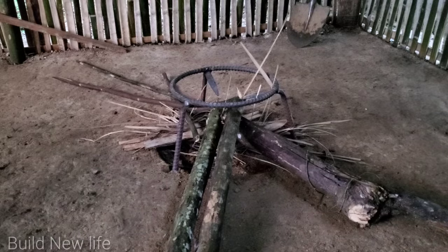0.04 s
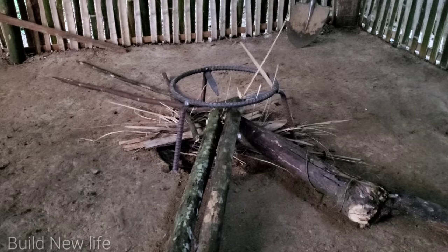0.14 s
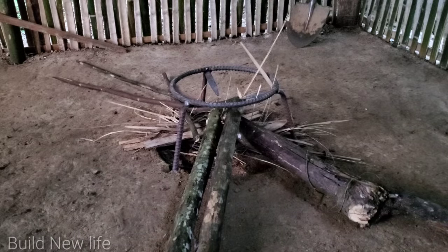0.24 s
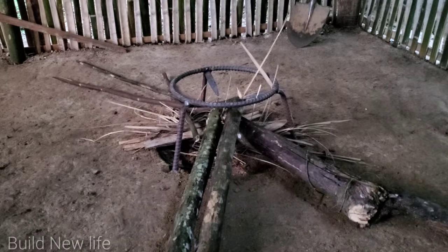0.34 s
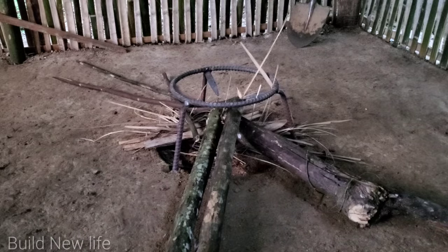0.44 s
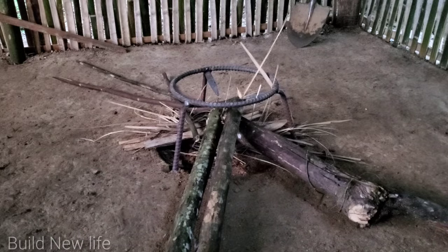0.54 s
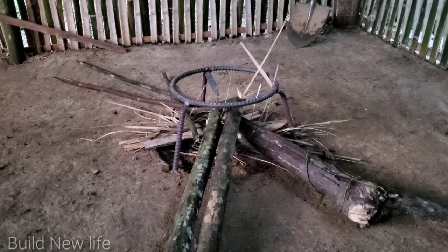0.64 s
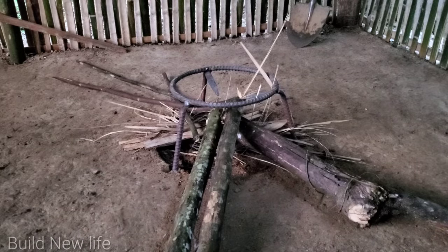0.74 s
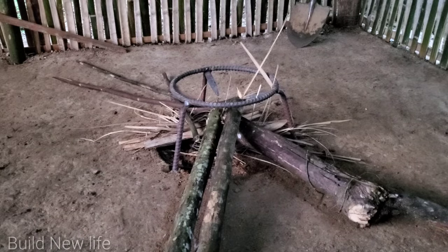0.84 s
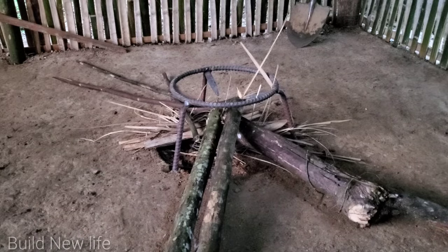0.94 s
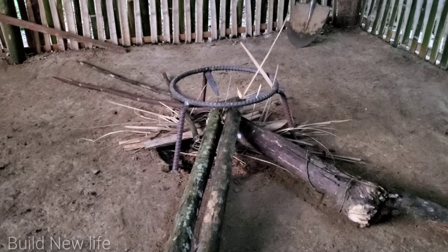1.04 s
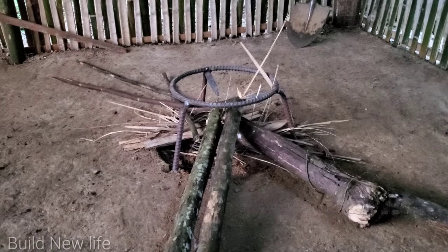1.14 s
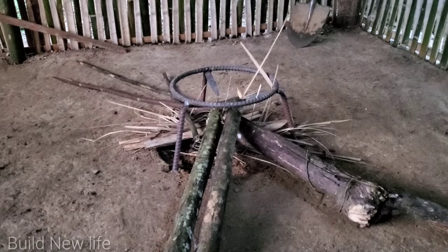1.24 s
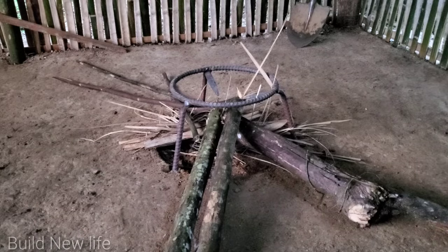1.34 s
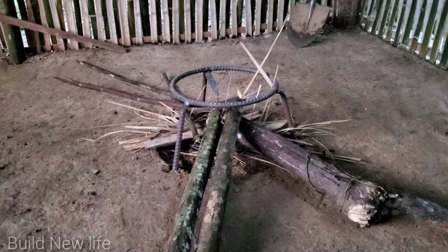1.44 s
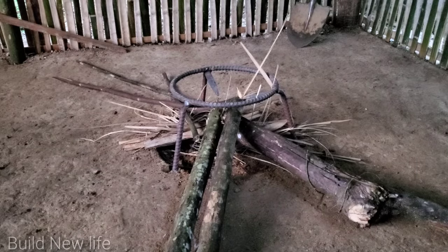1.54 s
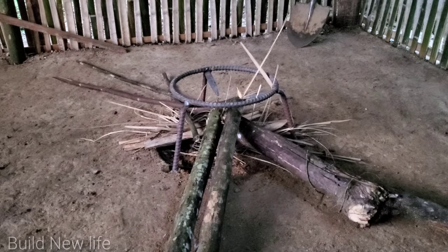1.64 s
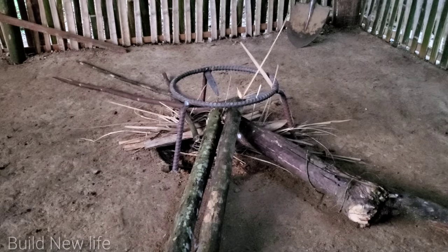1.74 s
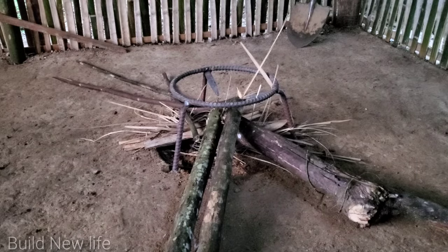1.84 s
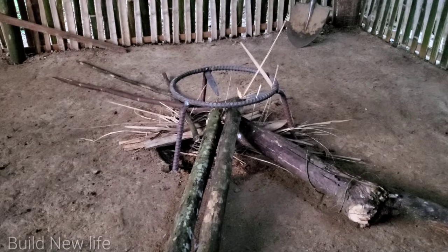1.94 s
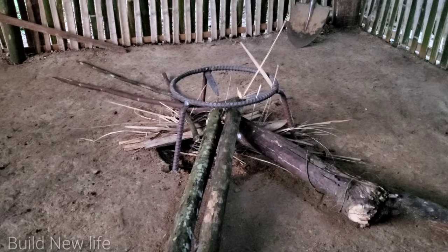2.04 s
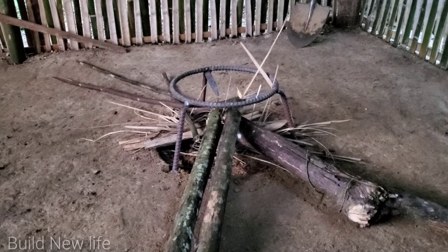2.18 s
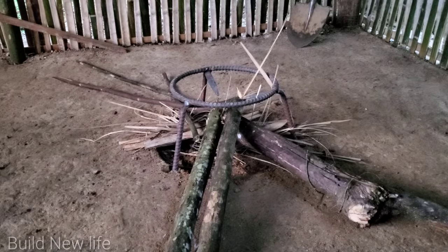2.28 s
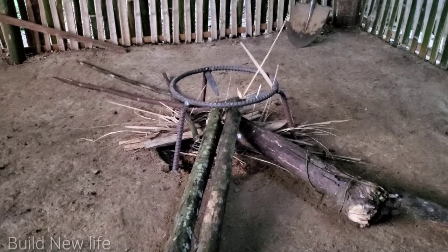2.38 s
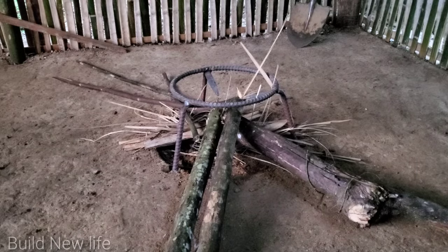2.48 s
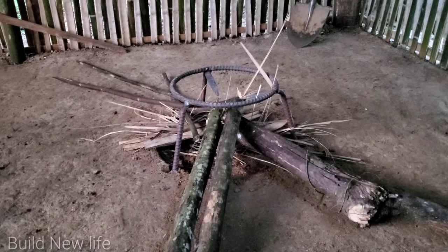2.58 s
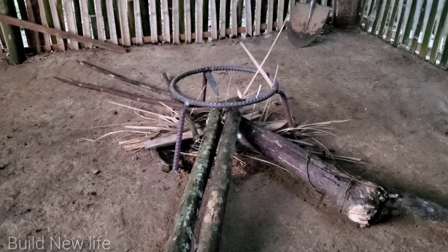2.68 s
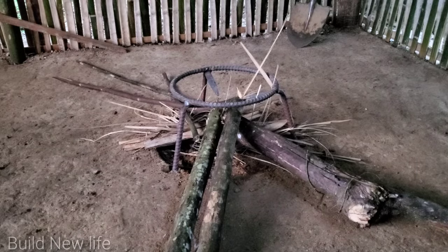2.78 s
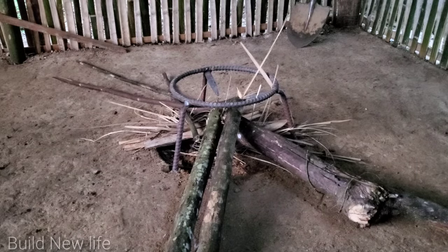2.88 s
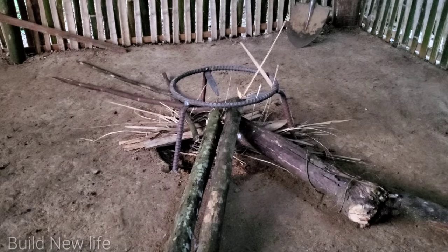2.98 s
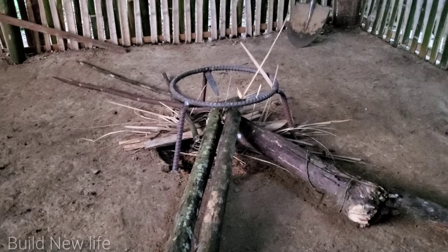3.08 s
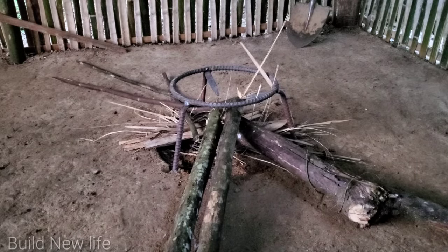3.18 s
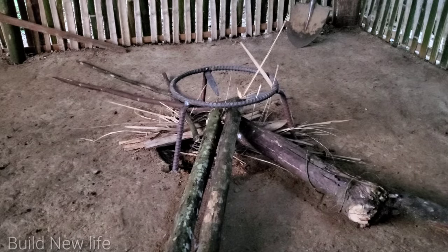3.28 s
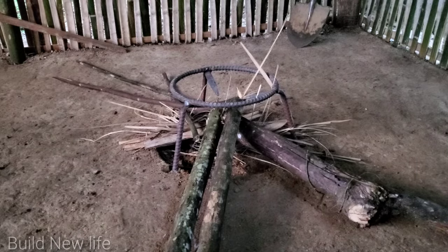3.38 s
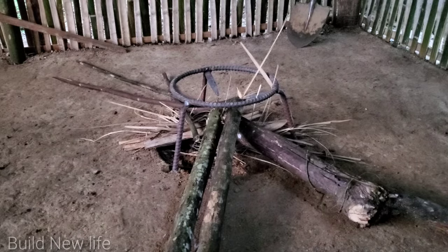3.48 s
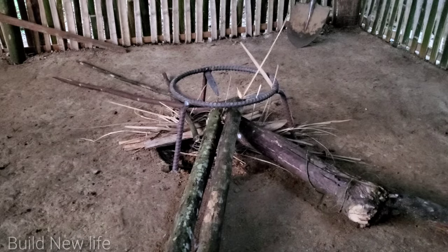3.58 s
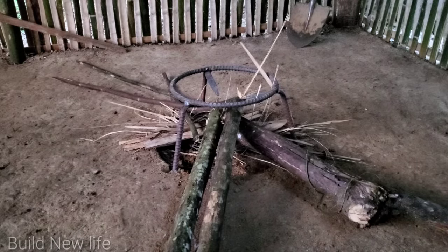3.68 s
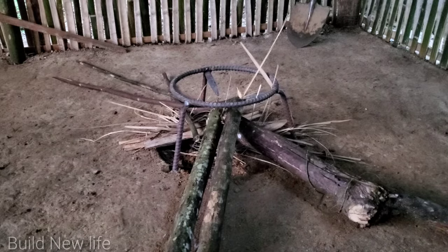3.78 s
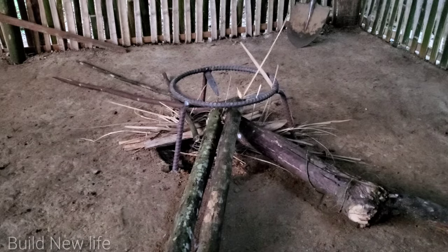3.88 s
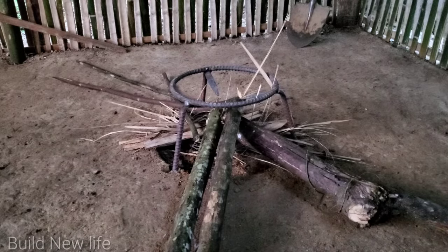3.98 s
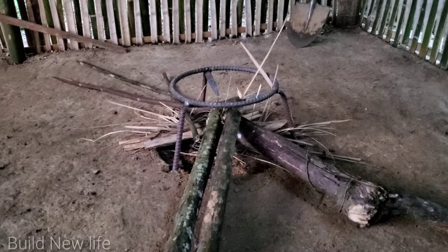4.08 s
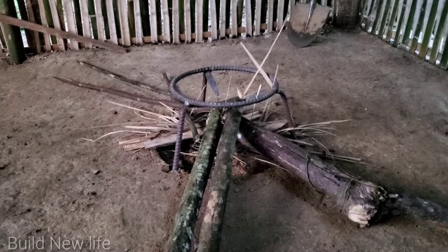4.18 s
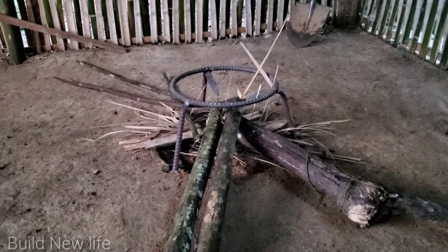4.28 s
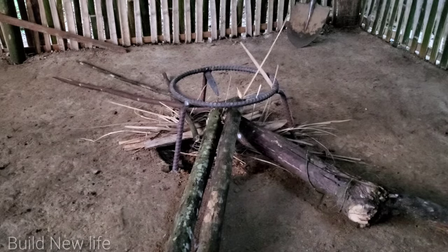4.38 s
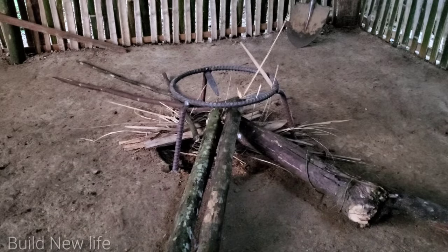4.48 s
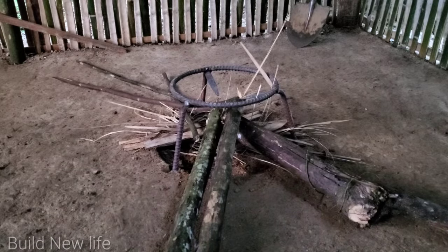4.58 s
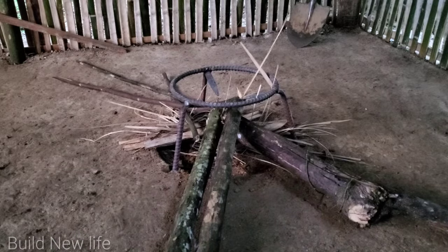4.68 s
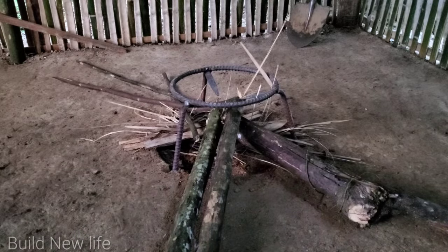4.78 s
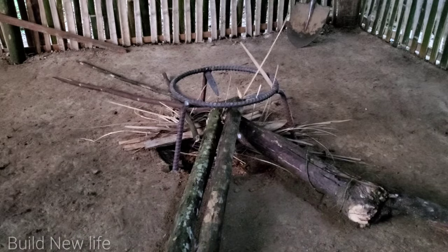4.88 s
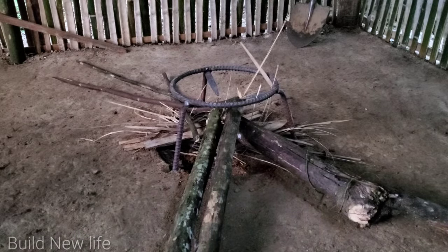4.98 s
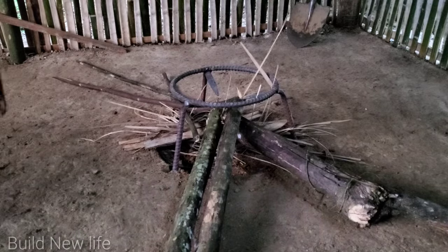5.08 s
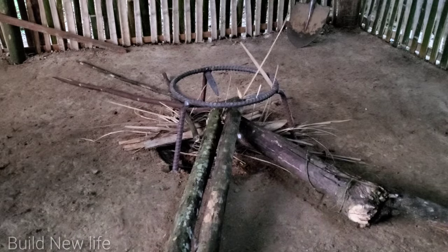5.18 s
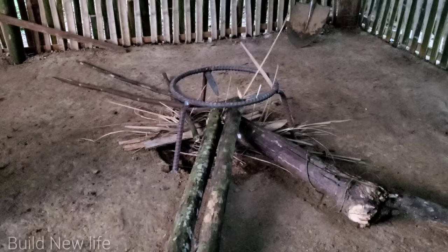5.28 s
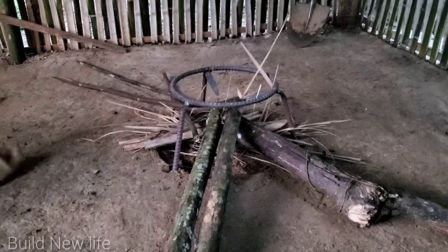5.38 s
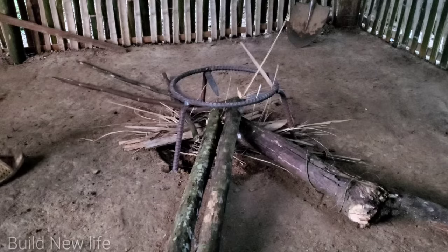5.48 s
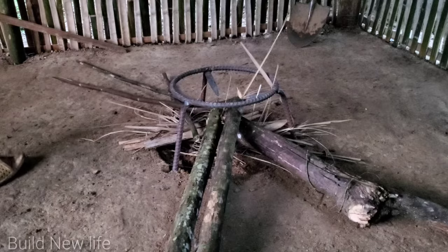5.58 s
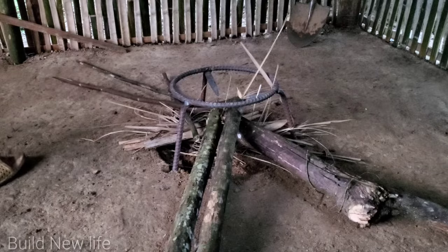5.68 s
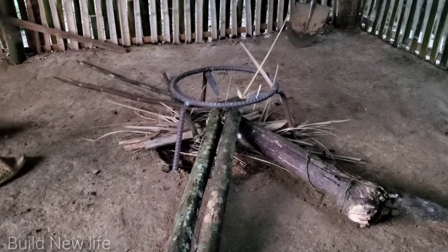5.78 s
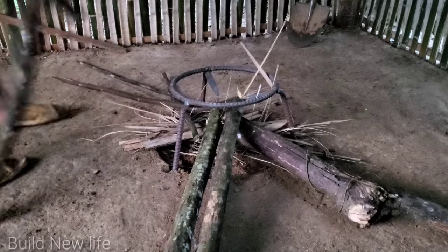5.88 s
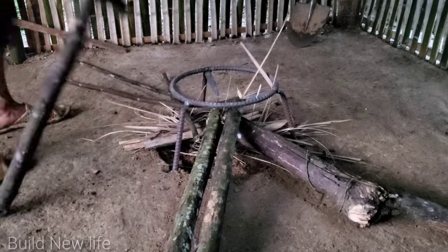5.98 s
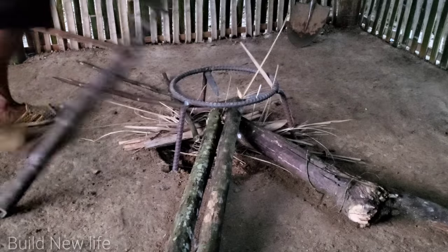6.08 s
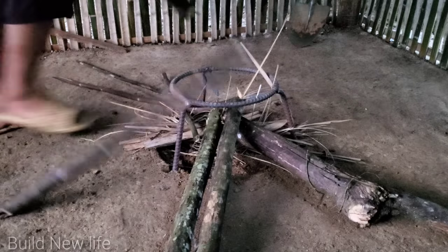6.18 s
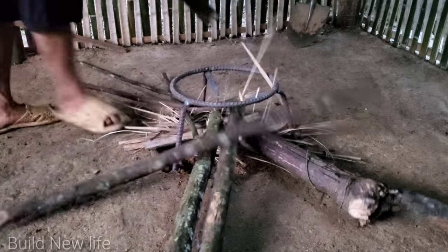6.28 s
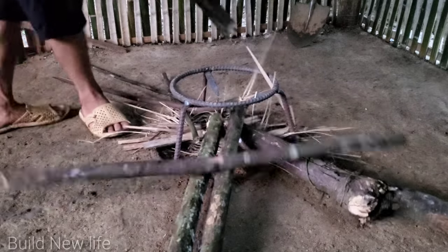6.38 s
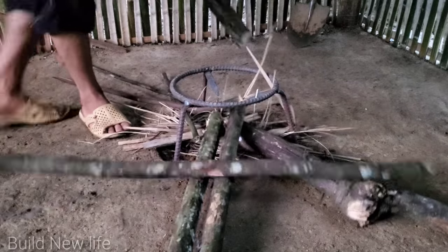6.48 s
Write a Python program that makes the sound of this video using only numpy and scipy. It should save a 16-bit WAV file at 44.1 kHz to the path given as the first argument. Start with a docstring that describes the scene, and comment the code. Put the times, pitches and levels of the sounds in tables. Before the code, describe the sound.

Someone shuffles about gathering dry wood with clacks and sharp snaps, then drops a log, while insects chirr softly.

```python
"""Gathering sticks in a hut at night

Someone shuffles in from the left over a dirt floor, gathering dry sticks, and knocks a log down by the
fire pit. Impacts excite the damped modes of wood and packed earth; friction, a dense train of tiny
contacts, makes the scraping; twigs snap by brittle fracture. The hut adds short echoes to the impacts,
and outside a chorus of insects chirrs over a faint hiss of air."""
import sys
import numpy as np
from scipy import signal
from scipy.fft import rfft, irfft, next_fast_len
from scipy.io import wavfile
from scipy.ndimage import uniform_filter1d

SR = 44100
rng = np.random.default_rng(int(sys.argv[2]) if len(sys.argv) > 2 else 0)


def unload_audio(sound):
    """Save the sound as a 16-bit wav file, at the path given as the first command line argument."""
    columns = np.transpose(np.atleast_2d(sound))
    # keep every value between -1 and 1, then stretch to whole-number steps
    steps = np.round(np.clip(columns, -1, 1) * 32767)
    wavfile.write(sys.argv[1], SR, steps.astype(np.int16))


N = 287965
FFT_SIZE = next_fast_len(N)
# Modes of the log: (frequency [Hz], level [dB], T60 [s])
LOG_MODES = [(292, -34, 0.094), (379, -9, 0.54), (503, -36, 0.072), (646.4, -5, 0.25), (786, -0.5, 0.047),
             (890, -1, 0.033), (1186, 8.5, 0.035), (1220, 4, 0.02), (1365, 18, 0.011), (1600, 6.5, 0.026),
             (1790, -40, .04), (2600, 1, 0.023)]


def stick_clacks():
    """Impact excitation: a contact and its dying rattle drive the modes of stick, bundle and log."""
    # (time [s], stick peak [dB], stick pitch [Hz], snap peak [dB], bundle peak [dB])
    clacks = [(.326, -54, 700, -31, -64), (.4205, -45.5, 643, -41, -52), (1.265, -42.5, 1080, -52, -66),
              (1.3234, -46, 796, -38, -50), (1.458, -48, 1120, -54, -52), (1.5921, -34, 1560, -52, -81),
              (1.6686, -41, 750, -37, -62), (1.7043, -32, 724, -47, -41.5), (1.7734, -33, 755, -28, -34),
              (1.774, -37, 1620, -50, -52), (1.956, -45.5, 1510, -55, -53), (2.0532, -42, 800, -31, -47),
              (2.907, -42, 1460, -41, -46), (2.9924, -43, 1310, -44, -82), (3.109, -42.5, 1360, -55, -60),
              (3.229, -52, 2750, -50, -60), (3.298, -46, 1750, -55, -79), (3.341, -36, 2020, -42, -69),
              (3.5171, -40, 1560, -46, -43), (3.56, -29, 2850, -26, -54), (3.6237, -28.5, 1600, -45, -67),
              (3.679, -29, 2420, -55, -41), (3.777, -46, 1880, -55, -42), (3.903, -44, 2400, -51, -70),
              (4.043, -37.5, 1490, -63, -45), (4.0844, -42.5, 740, -35, -52), (4.226, -36, 790, -48, -40.5),
              (4.2534, -23.5, 3030, -35, -55), (4.2654, -44, 3020, -32, -56), (4.3777, -26, 1760, -31, -66),
              (4.4053, -36.5, 790, -33, -50), (4.4302, -26.5, 2920, -46, -62),
              (4.4465, -27, 3100, -53, -65), (4.4873, -26.5, 3130, -40, -71),
              (4.562, -28.5, 2540, -43, -56), (4.65, -39, 1650, -48, -39), (4.6764, -36, 2100, -47, -56),
              (4.738, -60, 1410, -50, -70), (4.7703, -27, 1570, -38, -61), (4.806, -33, 1560, -50, -69),
              (4.8441, -40.5, 2660, -43, -40), (5.11, -33, 1760, -51, -38), (5.2083, -41, 1930, -58, -59),
              (5.2698, -21, 2800, -23, -37), (5.3095, -45, 1940, -49, -50), (5.319, -21, 3130, -42, -59),
              (5.448, -35, 2030, -50, -52), (5.5582, -44, 880, -47, -47), (5.629, -23, 3180, -27, -44),
              (5.642, -46, 1750, -27, -49), (5.678, -45, 1180, -47, -37.5), (5.77, -53, 1150, -57, -50),
              (5.8794, -79, 2090, -54, -59), (5.9631, -44, 1740, -50, -37)]
    # Modes of a stick: (frequency ratio [1], life to -60 dB [cycles], level [dB])
    stick_modes = [(1.0, 24, -6.5), (1.0, 8, 0), (.62, 7, -6), (1.3, 10, -4), (1.75, 11, -6), (.4, 6, -13)]
    rattle_t60, rattle_share = .065, .17  # s; size relative to the first contact
    out, t = np.zeros(N), np.arange(3600) / SR
    chance = rng.standard_normal((len(clacks), 2, len(t)), np.float32)
    detunings = rng.uniform(.85, 1.15, (len(clacks), len(stick_modes)))
    detunings[:, 0] = 1
    mode_weights = rng.random((len(clacks), len(LOG_MODES)))
    snap_band = signal.butter(2, [4000, 15000], "band", fs=SR, output="sos")
    bundle_band = signal.butter(2, [300, 1000], "band", fs=SR, output="sos")
    for clack, (size, trigger), detune, weights in zip(clacks, chance, detunings, mode_weights):
        time, stick_db, hz, snap_db, bundle_db = clack
        rattle = rattle_share * size * (trigger > .9) * gain_of(-60 * t / rattle_t60)
        rattle[0] = 1  # the first contact
        stick = sum(gain_of(db) * damped_sine(hz * ratio * k, cycles / (hz * ratio), t[:1500])
                    for k, (ratio, cycles, db) in zip(detune, stick_modes))
        stick *= 1 - np.exp(-t[:1500] * hz)  # builds up over about one cycle
        snap = signal.sosfilt(snap_band, rattle * gain_of(-8.0 * t / rattle_t60))
        carried_log = signal.fftconvolve(rattle, log_response(weights, t))
        add(out, time, peaked(signal.fftconvolve(rattle, stick), stick_db))
        add(out, time, peaked(snap, snap_db))
        add(out, time, peaked(signal.sosfilt(bundle_band, rattle), bundle_db))
        add(out, time, peaked(carried_log, bundle_db + 5))
    return out


def twig_snaps():
    """Brittle fracture: a breaking fibre releases a few bright cycles and a puff of splinters."""
    # (time [s], peak level [dB], pitch [Hz])
    snaps = [(0.4215, -31, 5860), (2.470, -26.5, 7600), (3.5598, -14.5, 6950), (4.251, -31, 5500),
             (4.4862, -27, 5430), (4.5635, -32, 4870), (4.7395, -27, 6280), (5.2714, -20, 5600),
             (5.5025, -32, 7200), (5.6293, -40, 5400), (5.655, -24, 12000), (5.672, -37, 12000),
             (5.7134, -31, 12400)]
    out, t = np.zeros(N), np.arange(1500) / SR
    splinters = np.diff(rng.standard_normal((len(snaps), len(t) + 1)), axis=1)
    for (time, db, hz), puff in zip(snaps, splinters):
        fibre = damped_sine(hz, t60=0.0022, t=t) * (1 - np.exp(-t / 0.000081))
        add(out, time, peaked(fibre + 0.048 * puff * gain_of(-60 * t / 0.027), db))
    return out


def falling_log():
    """Contact time limits bandwidth: shorter bounces reach higher modes. Each one sprays dirt."""
    # (time [s], peak level [dB], approximate contact time [ms])
    bounces = [(6.3199, -12.5, 0.15), (6.328, -38, 0.1), (6.334, -11, 0.074), (6.3414, -17.5, 0.21),
               (6.3545, -26, 0.45), (6.368, -40, 0.25), (6.389, -39, 0.41), (6.402, -33, 0.41),
               (6.414, -30.5, 0.35), (6.424, -29.5, 0.41), (6.441, -40, 0.73)]
    out, t = np.zeros(N), np.arange(12000) / SR
    mode_weights = rng.uniform(0.32, 1, (len(bounces), len(LOG_MODES)))
    sprays = np.diff(rng.standard_normal((len(bounces), len(t))), axis=1) * gain_of(-60 * t[1:] / 0.13)
    for (time, db, contact_ms), weights, spray in zip(bounces, mode_weights, sprays):
        force = signal.windows.hann(200) ** (2.6 / contact_ms ** 2)  # a bell centred 100 samples in
        knock = peaked(log_response(weights, t), 0.5) + 0.65 * damped_sine(730, t60=0.013, t=t)
        add(out, time - 100 / SR, peaked(signal.fftconvolve(knock, force), db))
        add(out, time, peaked(spray, db - 23.0))
    return out


def log_response(weights, t):
    """Modal superposition: the point of contact sets the weight of each mode of the log."""
    hz, db, t60 = np.transpose(LOG_MODES)[:, :, None]
    return weights @ (gain_of(db) * damped_sine(hz, t60, t))


def earth_thuds():
    """Heavy damping: struck earth swings a few cycles, crumbles and gives under a deep push."""
    # Footfalls and drops: (time [s], peak level [dB], pitch [Hz], deep push peak [dB])
    thuds = [(.081, -41.5, 467, -80), (0.325, -39.5, 352, -81), (0.4194, -29.5, 344, -76),
             (0.728, -36.5, 318, -72), (1.27, -61, 214, -58), (1.704, -41, 410, -75),
             (1.733, -45, 400, -73), (1.771, -60, 170, -60), (3.655, -33, 357, -74),
             (4.408, -28.5, 516, -79), (4.589, -38, 386, -76), (4.898, -31, 490, -45.5),
             (5.106, -49, 527, -57), (5.434, -32, 364, -49), (5.622, -37, 183, -52.5),
             (5.67, -43, 270, -52), (5.955, -30, 396, -50), (5.971, -38, 194, -24), (6.268, -50, 326, -80),
             (6.321, -33.5, 483, -48)]
    life_cycles = 5.2
    out, t = np.zeros(N), np.arange(6000) / SR
    chance = rng.standard_normal((len(thuds), 2, len(t)))
    for (time, db, hz, push_db), (size, trigger) in zip(thuds, chance):
        crumble = 0.42 * size * (trigger > 2.2) * gain_of(-60 * t / 0.085)
        crumble[0] = 1  # the first contact
        thud = signal.fftconvolve(crumble, damped_sine(hz, life_cycles / hz, t))
        push = damped_sine(hz=94.4, t60=0.13, t=t) * (1 - np.exp(-t / 0.001))
        add(out, time, peaked(thud, db))
        add(out, time, peaked(push, push_db))
    return out


def friction():
    """Friction noise: clumps of tiny contacts make bark scrape, grit hiss, feet and cloth shuffle."""
    # Spectra of the three textures: (frequency [Hz], relative spectral density [dB])
    scrape_spectrum = [(180, -53), (300, -47), (371, -8.5), (495, -10.5), (808, -2), (1040, -8.5),
                       (1610, 2), (1870, 0), (6000, -10), (7800, -36), (13200, -120)]
    grit_spectrum = [(1000, -15), (3000, 0), (6000, -6.5), (8000, -5), (10500, -9), (13000, -9),
                     (16000, -12.5)]
    shuffle_spectrum = [(18, -63), (30, -20), (49, -15), (243, 0), (378, 6), (524, -0.5), (737, 9.5),
                        (900, 4), (1170, -95), (1980, -120)]
    grit_gain, scrape_gain, shuffle_gain = friction_envelopes()
    clumps = wander(samples=250)
    bark = grains(per_s=3000, spread_db=2.2) * gain_of(3.2 * clumps)
    log_ring = log_response(np.ones(len(LOG_MODES)), np.arange(3000) / SR)
    carried_log = unit_rms(signal.oaconvolve(bark, log_ring[None], axes=1)[:, :N])
    scrape = unit_rms(coloured(bark, scrape_spectrum) + gain_of(-6) * carried_log)
    grit = coloured(grains(per_s=9000, spread_db=1.8) * gain_of(1.8 * clumps), grit_spectrum)
    shuffle = coloured(grains(per_s=1500, spread_db=1.0) * gain_of(0.5 * clumps), shuffle_spectrum)
    return scrape_gain * scrape + grit_gain * grit + shuffle_gain * shuffle


def friction_envelopes():
    """Incoherent sources add in power: bustle plus scuffs give the gains of grit, scrape and shuffle."""
    # Slow background of movement: (time [s], grit [dB], scrape [dB], shuffle [dB])
    bustle = [(0, -63, -64, -95), (.5, -68, -67, -72), (.8, -61.5, -62.5, -107),
              (1.12, -59.5, -65.5, -66.5), (1.35, -65, -60.5, -63.5), (1.9, -55.5, -61.5, -56),
              (2.2, -57.5, -60.5, -70), (2.45, -65, -67.5, -100), (2.8, -60.5, -59.5, -64.5),
              (3.2, -57, -56, -67), (3.5, -58.5, -54.5, -68), (3.902, -56.5, -55.5, -63),
              (4.3, -54, -58, -75), (4.6, -54.5, -52.5, -56), (5, -59.5, -78, -64.5),
              (5.5, -56.5, -61, -64.5), (5.9, -57, -59.5, -56), (6.18, -90, -81, -93),
              (6.53, -57, -62, -73)]
    # Sandals and dragged sticks: (peak time [s], length [s], grit [dB], scrape [dB], shuffle [dB])
    scuffs = [(0.352, 0.2, -50.5, -54, -55.5), (0.704, 0.083, -44.5, -48.5, -73),
              (1.319, 0.14, -54, -53, -51.5), (1.39, 0.17, -50.5, -69, -58), (1.63, 0.75, -47, -52, -78),
              (1.75, 0.22, -58, -43.5, -42), (2.075, 0.19, -51, -47.5, -48.5),
              (2.24, 0.09, -60, -42.5, -70), (2.899, 0.08, -55, -54, -72), (3.275, 0.44, -50.5, -71, -63.5),
              (3.586, 0.28, -40.5, -45, -75), (3.638, 0.043, -50, -38, -60), (3.679, 0.16, -46, -36.5, -40),
              (4.06, 0.097, -53, -44, -62), (4.267, 0.098, -35, -41.5, -73), (4.427, 0.14, -47.5, -40, -70),
              (4.58, 0.091, -55, -40, -56), (4.672, 0.2, -42.5, -37, -53), (4.801, 0.37, -50.5, -41, -65),
              (4.901, 0.16, -55, -52, -47), (5.136, 0.15, -48.5, -41.5, -66),
              (5.296, 0.078, -40.5, -43, -60), (5.316, 0.14, -47.5, -38, -66),
              (5.464, 0.086, -49, -43.5, -73), (5.636, 0.041, -44, -37, -56),
              (5.675, 0.079, -38.5, -66, -46), (5.975, 0.078, -45, -41, -49),
              (6.062, 0.24, -48.5, -57, -85), (6.345, 0.36, -48, -57, -64)]
    rise_share, ends_db = 0.52, -21  # part of a scuff spent rising; its ends relative to its peak
    t = np.arange(0, N + 64, 64) / SR
    times, *levels = np.transpose(bustle)
    power = np.array([gain_of(2 * np.interp(t, times, db)) for db in levels])
    for time, length, *db in scuffs:
        from_peak = np.maximum((time - t) / rise_share, (t - time) / (1 - rise_share)) / length
        power += gain_of(2 * (np.array(db)[:, None] + ends_db * from_peak))
    return [np.interp(np.arange(N) / SR, t, gain) for gain in np.sqrt(power)]


def insects():
    """Stridulation: random strokes of many insects drive wing resonances that throb unevenly."""
    # Wing resonances: (frequency [Hz], width [Hz], relative level [dB])
    resonances = [(2340, 590, -12.5), (4343, 475, 1.5), (4552, 183, -5), (4860, 28, -9), (5290, 930, -6.5),
                  (8010, 500, -12)]
    chorus, t = np.zeros((2, N)), np.arange(2000) / SR
    strokes = grains(per_s=4000, spread_db=0.56)
    for hz, width, db in resonances:
        wing = t ** 2 * np.exp(-np.pi * width * t) * np.sin(2 * np.pi * hz * t)  # a steep-sided band
        chirr = unit_rms(signal.oaconvolve(strokes, wing[None], axes=1)[:, :N])
        chorus += gain_of(db + 1.1 * wander(samples=500)) * chirr
    return gain_of(-49.5) * unit_rms(chorus)


def night_air():
    """Stationary noise: air and far hiss form a steady broadband floor."""
    # (frequency [Hz], relative spectral density [dB])
    air_spectrum = [(30, 6), (100, -12), (250, -1), (450, 2.5), (700, -2), (1700, -11.5), (3300, 3.5),
                    (3800, -2), (6100, -3.5), (7200, -1), (8800, -5), (10500, -23), (16000, -6.5)]
    return gain_of(-58) * coloured(rng.standard_normal((2, N)), air_spectrum)


def in_hut(x, lag_samples, wet_db):
    """Direct plus reverberant sound; the far port also hears scattering round the microphone body."""
    # Decay of the room and of the scattering: (frequency [Hz], T60 [s])
    room_decay = [(100, 0.019), (500, 0.079), (2000, 0.16), (8000, 0.01)]
    scatter_decay = [(100, 0.18), (8000, 0.028)]
    near = x + gain_of(wet_db) * echoes(x, room_decay)
    scattered = echoes(x, scatter_decay) + gain_of(wet_db) * echoes(x, room_decay)
    return microphone_ports(near, scattered, lag_samples)


def echoes(x, decay):
    """Frequency-dependent absorption: each band of the sparse reflections dies at its own rate."""
    drift_hz, echoes_per_s = 1.7, 4000
    # Crossfading three echo patterns stands for the source moving about.
    phase = 2 * np.pi * (np.arange(N) / SR * drift_hz + np.arange(3)[:, None] / 3)
    feeds = x * np.sqrt((1 + np.cos(phase)) / 3)
    taps = rng.choice([-1., 1.], (3, SR // 4)) * (rng.random((3, SR // 4)) < echoes_per_s / SR)
    hz, t, bands = signal.stft(taps, SR, nperseg=64)
    tails = signal.istft(bands * gain_of(-60 * t / curve_at(decay, hz)[:, None]), SR, nperseg=64)[1]
    tails /= np.linalg.norm(tails, axis=1)[:, None]
    return signal.oaconvolve(feeds, tails, axes=1).sum(0)[:N]


def microphone_ports(near, scattered, lag_samples):
    """Partial coherence: the right port shares part of the left one's sound, delayed and shaded."""
    # Likeness of the two ports: (frequency [Hz], coherence [1])
    coherence_curve = [(60, .995), (300, .95), (700, .8), (2000, .45), (5000, .2), (15000, .2)]
    # Shading: (frequency [Hz], left over right [dB])
    shading = [(60, 1.5), (500, 1.5), (2500, 5), (4400, 2.5), (9000, 9), (15000, 4)]
    hz = np.fft.rfftfreq(FFT_SIZE, 1 / SR)
    coherence = np.clip(curve_at(coherence_curve, hz), 0, 1)
    tilt = gain_of(curve_at(shading, hz) / 2)
    left = rfft(near, FFT_SIZE)
    delayed = left * np.exp(-2j * np.pi * hz * lag_samples / SR)
    right = coherence * delayed + np.sqrt(1 - coherence ** 2) * rfft(scattered, FFT_SIZE)
    return irfft(np.array([left * tilt, right / tilt]), FFT_SIZE)[:, :N]


def grains(per_s, spread_db):
    """Shot noise: two independent trains of random clicks, a few much larger than the rest."""
    size = gain_of(spread_db * np.minimum(rng.exponential(1, (2, N)), 3))
    return unit_rms(size * rng.standard_normal((2, N)) * (rng.random((2, N)) < per_s / SR))


def wander(samples):
    """Low-passed noise, bounded to +-1, that changes over about this many samples."""
    smooth = uniform_filter1d(uniform_filter1d(rng.standard_normal(N), samples), samples)
    return np.tanh(unit_rms(smooth))


def damped_sine(hz, t60, t):
    """Free decay of one mode, falling 60 dB in t60 seconds."""
    return np.sin(2 * np.pi * hz * t) * gain_of(-60 * t / t60)


def coloured(x, spectrum):
    """Spectral shaping by a curve in dB, scaled to unit RMS."""
    response = gain_of(curve_at(spectrum, np.fft.rfftfreq(FFT_SIZE, 1 / SR)))
    return unit_rms(irfft(rfft(x, FFT_SIZE) * response, FFT_SIZE)[..., :N])


def curve_at(points, hz):
    """Interpolation on a logarithmic frequency axis."""
    frequencies, values = np.transpose(points)
    return np.interp(np.log(hz + 1), np.log(frequencies + 1), values)


def gain_of(db):
    """Amplitude ratio of a level in decibels."""
    return 10 ** (np.asarray(db) / 20)


def unit_rms(x):
    """Normalisation to an RMS of 1."""
    return x / np.sqrt(np.mean(x ** 2) + 1e-20)


def peaked(x, peak_db):
    """Normalisation to a peak level."""
    return gain_of(peak_db) * x / (abs(x).max() + 1e-12)


def add(mix, time, sound):
    """Superposition of a sound on the mix, starting at a time in seconds."""
    part = mix[round(time * SR):][:len(sound)]
    part += sound[:len(part)]


def scene():
    """Arrival-time difference sets direction: night and handling to the left, the log nearer the front."""
    bed = microphone_ports(*(night_air() + insects() + friction()), lag_samples=20)
    impacts = in_hut(stick_clacks() + twig_snaps() + earth_thuds(), lag_samples=20, wet_db=-5)
    return bed + impacts + in_hut(falling_log(), lag_samples=2, wet_db=-5)


def record(dry):
    """Band limiting: the microphone loses the deep bass, and a steep low-pass cuts the top treble."""
    thin = signal.sosfilt(signal.butter(3, 70, "high", fs=SR, output="sos"), dry)
    low_pass = signal.firwin(511, 15750, window=("kaiser", 9), fs=SR)
    return signal.oaconvolve(thin, low_pass[None], "same")


dry = scene()
out = record(dry)
unload_audio(out)
```